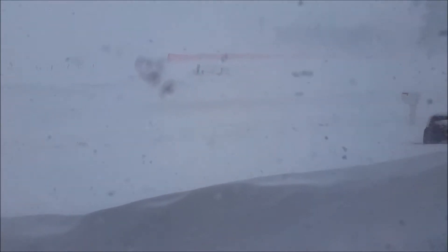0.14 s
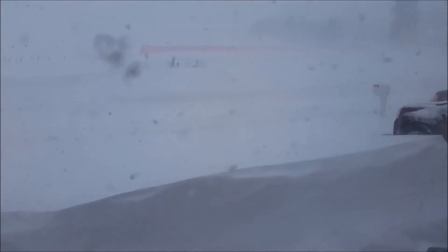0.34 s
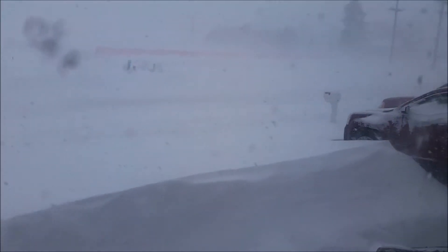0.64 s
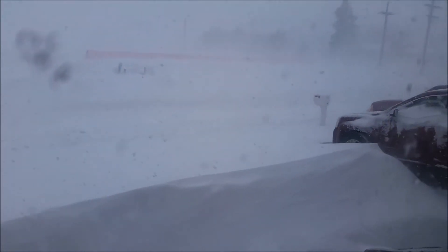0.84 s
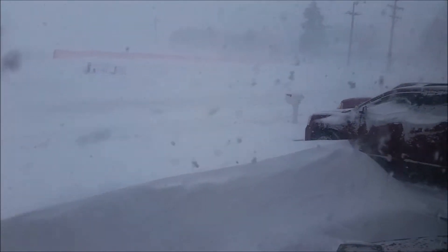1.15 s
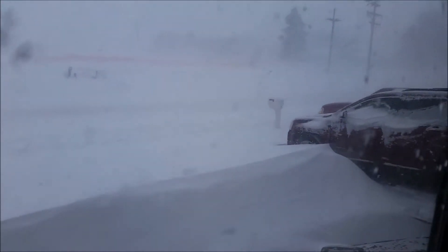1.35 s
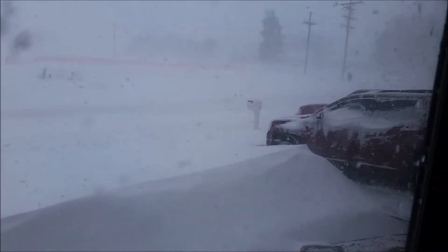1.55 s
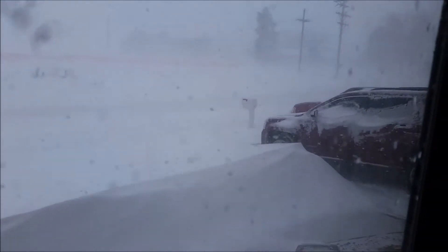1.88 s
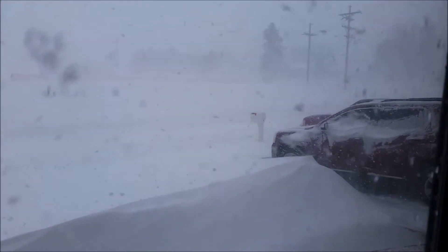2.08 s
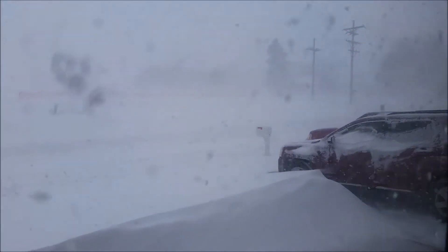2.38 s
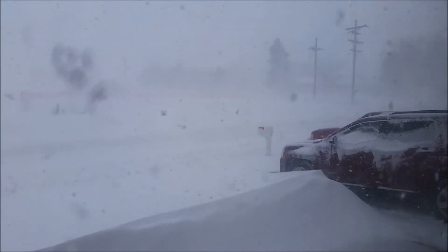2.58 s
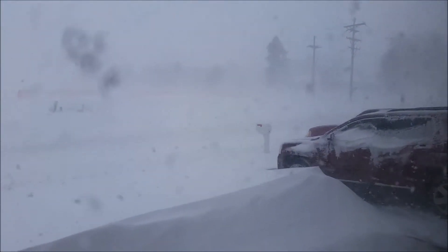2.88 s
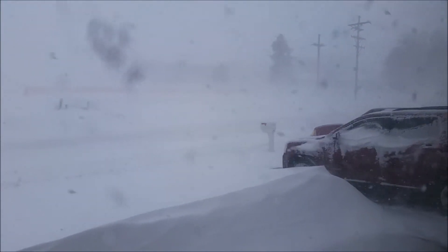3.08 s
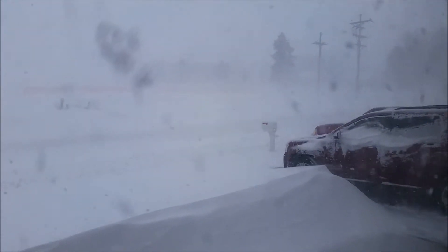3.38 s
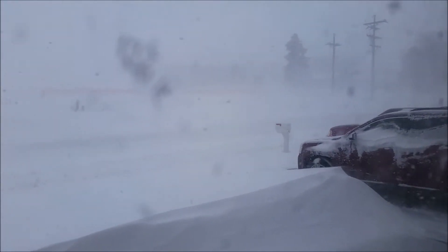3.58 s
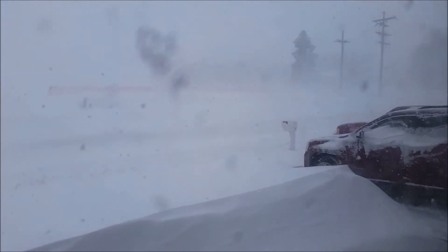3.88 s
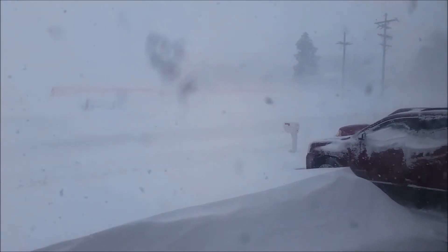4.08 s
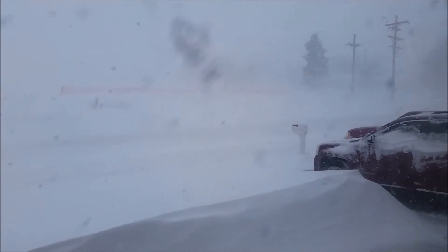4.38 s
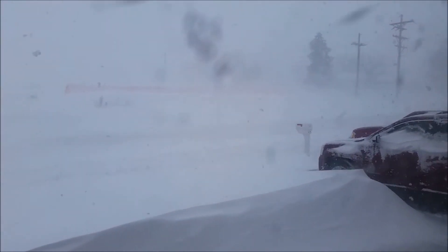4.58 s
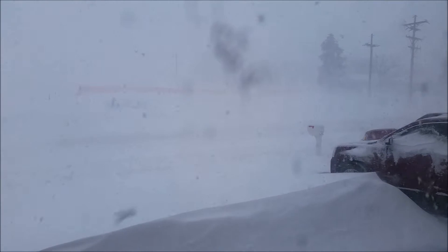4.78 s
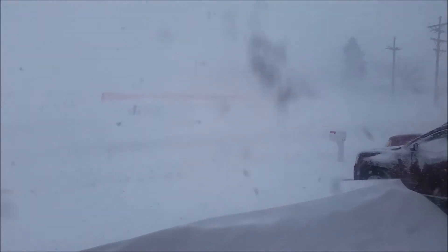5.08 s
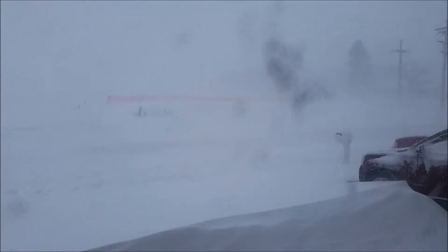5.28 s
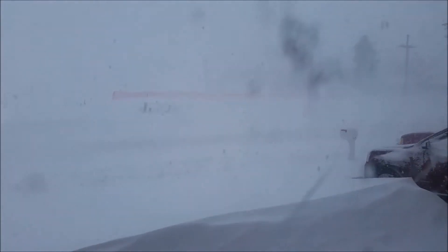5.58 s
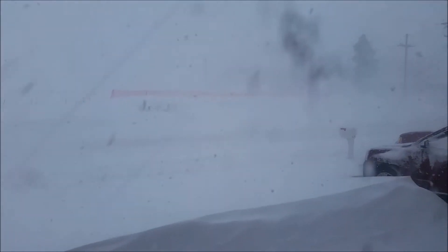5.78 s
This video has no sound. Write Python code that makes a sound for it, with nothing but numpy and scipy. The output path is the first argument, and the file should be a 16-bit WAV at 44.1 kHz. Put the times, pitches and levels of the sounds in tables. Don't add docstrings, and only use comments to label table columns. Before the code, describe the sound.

Muffled gusts and a low pulsing motor hum heard indoors, with busy bumpy handling clatter at first, then sparse snaps and ticks.

```python
import sys
import numpy as np
from scipy import signal
from scipy.fft import rfft, irfft, next_fast_len
from scipy.io import wavfile
from scipy.ndimage import uniform_filter1d, map_coordinates

SR = 44100
rng = np.random.default_rng(int(sys.argv[2]) if len(sys.argv) > 2 else 0)


def file_out(sig):
    cols = np.atleast_2d(sig).T
    lim = np.clip(cols, -1, 1)
    pcm = np.round(lim * 32767).astype(np.int16)
    wavfile.write(sys.argv[1], SR, pcm)


def magnitude_from_level(level_db):
    exponent = np.asarray(level_db, float) / 20
    return 10 ** exponent


N = 261954


def unit(x):
    return x / np.sqrt(np.mean(x ** 2) + 1e-20)


def along(points, hz):
    f, v = np.transpose(points)
    return np.interp(np.log(hz + 1), np.log(f + 1), v)


def curves(rows):
    s, *cols = np.transpose(rows)
    return [np.interp(np.arange(N) / SR, s, c, left=-150, right=-150) for c in cols]


def wobble(rate):
    coarse = np.arange(0, N + 16, 16)
    knots = rng.standard_normal(int(N * rate / SR) + 4)
    return np.interp(np.arange(N), coarse, map_coordinates(knots, [coarse * rate / SR]))


def filtered(x, response):
    m = next_fast_len(x.shape[-1] + 8192)
    return irfft(rfft(x, m) * response(np.fft.rfftfreq(m, 1 / SR)), m)[..., :x.shape[-1]]


def shaped(points):
    return lambda hz: magnitude_from_level(along(points, hz))


def resonances(modes):
    return lambda f: sum(magnitude_from_level(db) * (f * w) ** 2 / ((c * c - f * f) ** 2 + (f * w) ** 2) for c, w, db in modes)


def ring(hz, t60, rise, t):
    return np.sin(2 * np.pi * hz * t) * magnitude_from_level(-60 * t / t60) * (1 - np.exp(-t / rise))


def burst(t60, rise, t):
    return rng.standard_normal((2, len(t))) * magnitude_from_level(-60 * t / t60) * (1 - np.exp(-t / rise))


def panned(left_minus_right_db):
    return left_minus_right_db * np.array([[.5], [-.5]])


def strokes(rows):
    t = np.arange(N) / SR
    return sum(magnitude_from_level(db - 60 * np.where(t < s, (s - t) / swell, (t - s) / t60)) for s, db, swell, t60 in rows)


def add(out, s, sound):
    out[:, round(s * SR):][:, :sound.shape[1]] += sound


# (frequency [Hz], correlation [-1 to 1])
PORT_LIKENESS = [(60, 1), (180, 0.86), (550, 0.49), (1650, -0.2), (4970, 0.028), (15000, -0.21)]
# (frequency [Hz], left minus right [dB])
PORT_LEAN = [(60, -7), (110, 2), (200, -2.5), (380, 1.5), (700, 6.5), (1290, 10), (2380, 9.5), (4400, 8),
             (8120, 3.5), (15000, -3)]


def airflow(gain, patchy_db, alike=PORT_LIKENESS):
    z = signal.stft(rng.standard_normal((2, N)), nperseg=512)[2]
    field = rng.standard_normal(z.shape[1:])
    field = uniform_filter1d(uniform_filter1d(field, size=6, axis=0), size=12, axis=1)
    pair = signal.istft(z * magnitude_from_level(patchy_db * unit(field)), nperseg=512)[1][:, :N]
    m = next_fast_len(N, real=True)
    hz = np.fft.rfftfreq(m, 1 / SR)
    turn = np.arccos(np.clip(along(alike, hz), -1, 1)) / 2
    mid, side = rfft(pair, m) * gain(hz) * [np.cos(turn), np.sin(turn)]
    ports = irfft(magnitude_from_level(panned(along(PORT_LEAN, hz))) * [mid + side, mid - side], m)[:, :N]
    return ports / np.std(ports.mean(axis=0))


# (time [s], strength [dB])
GUST_STRENGTH = [(0, 2), (.3, 1.5), (.55, 7.5), (.85, 1), (1.3, 1.5), (1.6, 4.5), (1.9, 0), (2.5, 1),
                 (3.0, -1), (3.4, 0), (4.5, -1), (5.0, 2), (5.4, -1), (5.94, 0)]
# (frequency [Hz], density [dB per Hz])
WALL_ROAR = [(12, -17.5), (25, -16), (45, -1), (70, -6), (140, 4), (220, -7), (330, -9), (420, -19.5),
             (700, -36.5), (1500, -63)]
# (frequency [Hz], density [dB per Hz])
FRAME_RUSH = [(200, -37.5), (450, 1.5), (950, -4), (1850, -11), (2100, -8.5), (3000, -12), (3750, -30.5),
              (4250, -21), (5600, -27), (7500, -49.5), (10000, -43), (12000, -79.5)]
# (frequency [Hz], density [dB per Hz])
PORT_HISS = [(6000, -36.5), (9000, -26), (11500, -10), (14300, -2), (15700, -0.5)]
# (peak time [s], level [dB], swell over 60 dB [s], decay t60 [s])
SKIN_RUBS = [(.02, -75, .9, 1.5), (.54, -78, .9, .4), (.71, -75, 0.5, 1.8), (1.6, -71.5, 1, .7),
             (5.72, -70, 1, 1.3)]


def wind():
    strength_db, = curves(GUST_STRENGTH)
    gust = wobble(6)
    roar_db = -40.5 + strength_db + 0.51 * gust + 0.97 * wobble(18)
    roar = magnitude_from_level(roar_db) * airflow(shaped(WALL_ROAR), patchy_db=0.43)
    rush_db = -56 + 0.5 * strength_db + 0.95 * gust
    rush = magnitude_from_level(rush_db) * airflow(shaped(FRAME_RUSH), patchy_db=1.16)
    pumping = magnitude_from_level(-55.5 + 6.8 * gust) * airflow(resonances([(45.4, 41, 0)]), patchy_db=0.5, alike=[(30, 0.58)])
    rub_gain = strokes(SKIN_RUBS) * magnitude_from_level(5.5 + 1.5 * wobble(60))
    hiss_gain = magnitude_from_level(-72 + 0.15 * strength_db)
    return roar + rush + pumping + (hiss_gain + rub_gain) * airflow(shaped(PORT_HISS), patchy_db=0)


# (shaft order, mains order, level [dB])
MOTOR_LINES = [(1, 0, -43.3), (2, 0, -52), (3, 0, -43.5), (4, 0, -52.5), (0, 1, -41.3), (1, 1, -47.7),
               (2, 1, -58)]
# (frequency [Hz], level [dB])
LOOSE_PANELS = [(56.2, -57), (177.3, -59), (262.2, -56)]


def heater():
    shaft_hz, mains_hz = 38.257, 119.98
    t = np.arange(N) / SR
    lines = [(shaft * shaft_hz + mains * mains_hz, db) for shaft, mains, db in MOTOR_LINES] + LOOSE_PANELS
    return np.sqrt(2) * sum(magnitude_from_level(db + wobble(3.3)) * np.cos(2 * np.pi * hz * t) for hz, db in lines)


# (frequency [Hz], strength, decay t60 [s])
RIGHT_THUMP = [
    (306, 1.63, .016),
    (86.5, 7.5, .032),
    (96.3, -9, .027),
]
# (frequency [Hz], strength, decay t60 [s], rise [s])
LEFT_THUMP = [(230.6, -0.18, 0.064, .0001), (118, -0.35, 0.075, 0.0027)]
# (frequency [Hz], level [dB], decay t60 [s])
SHELL_MODES = [(855, -6, 0.016), (1000, -3.5, 0.018), (1355, -4.5, 0.017), (1900, -9, 0.011),
               (2550, -18, 0.018), (4500, -37.5, 0.0058)]


def slips(table, stiff, sway, boom_db, fizz_db, sense):
    knock, airy, t = np.zeros((2, N + SR)), np.zeros((2, N + SR)), np.arange(SR // 10) / SR
    for s, thump_db, snap_db, ring_db, ring_hz in table:
        flex = stiff * (1 + 0.038 * rng.standard_normal())
        left = sum(g * ring(hz * flex / stiff, t60, rise, t) for hz, g, t60, rise in LEFT_THUMP)
        body, *pair = [g * ring(hz * flex, t60 / flex, .0002, t) for hz, g, t60 in RIGHT_THUMP]
        shell = ring(ring_hz, .016, .0004, t)
        for hz, db, t60 in SHELL_MODES:
            shell = shell + magnitude_from_level(db + rng.normal(0, 2.5)) * ring(hz * rng.normal(1, .04), t60, .0003, t)
        boom = -magnitude_from_level(thump_db + boom_db) * ring(505 * flex / stiff, 0.027, 0.00019, t)
        crack = burst(0.013, 0.00014, t)
        grit = filtered(crack[0], resonances([(1740, 970, 0.022)]))
        fizz = filtered(crack[1], resonances([(14600, 3550, 0)]))
        snap = ring(2000 * rng.normal(1, .06), .0028, .0001, t) + .5 * ring(850, .005, .0002, t) + .7 * grit
        thump = np.array([sway * left, body + sway * sum(pair)])
        ringing = magnitude_from_level(ring_db - 5.5) * (shell + 1.2 * grit) * [[-1], [.25]]
        edge = np.hypot(magnitude_from_level(snap_db), magnitude_from_level(ring_db)) ** 0.64
        start = s - .0021 / stiff
        add(knock, start, sense * magnitude_from_level(thump_db + 1.0) * thump)
        add(knock, start + 0.00033, sense * magnitude_from_level(snap_db + 3.5) * snap * [[0], [1]])
        add(knock, start + .0007, sense * (ringing + boom * [[1], [.1]]))
        add(airy, start + .0004, edge * magnitude_from_level(fizz_db + np.array([[-12], [5]])) * fizz)
    damped = filtered(knock, lambda hz: 1 / (1 + 1j * hz / 3600) ** 2)
    return (damped + airy)[:, :N]


# (time [s], thump [dB], right snap [dB], left ring [dB], ring frequency [Hz])
SOFT_JERKS = [(0.0822, -23.5, -30, -17, 1400), (0.1298, -22.5, -34, -23.5, 1380),
              (0.3664, -13, -23, -13, 1300), (0.5031, -17, -17, -13.5, 1050),
              (0.5939, -10.5, -27, -20, 1550), (0.6276, -9, -16.5, -11.5, 1120),
              (0.7769, -15.5, -22, -21, 930), (0.9354, -11.5, -12.5, -16, 1490),
              (1.0816, -9.5, -20.5, -20, 1040), (1.307, -12, -40, -11, 960),
              (1.4844, -11.5, -19.5, -33, 1830), (1.5172, -12, -24, -27, 2040),
              (1.6689, -10.5, -24, -26, 880)]


def creaks():
    return slips(SOFT_JERKS, stiff=0.98, sway=0.84, boom_db=-20, fizz_db=-20.5, sense=0.9)


# (time [s], thump [dB], left ring [dB], ring frequency [Hz])
LOOSE_SLIPS = [(0.1517, -21.5, -37, 1820), (0.3802, -21.5, -31, 750), (0.5275, -15.5, -24, 1400),
               (0.6442, -14, -21, 910), (0.6582, -12, -20.5, 1350), (0.6717, -11.5, -23.5, 1400),
               (0.6858, -12.5, -23, 1300), (0.7033, -15, -25, 2140), (0.725, -17, -25.5, 1860),
               (0.9172, -33, -26, 960), (0.9598, -11.5, -21, 990), (0.9782, -14, -34, 1020),
               (0.996, -16, -26.5, 1400), (1.013, -14, -30, 1050), (1.3278, -16, -24, 1450),
               (1.353, -15.5, -26, 1300), (1.3771, -15, -30, 940), (1.3996, -15.5, -27, 1650),
               (1.5392, -15.5, -27, 1250), (1.5569, -13, -24.5, 1130), (1.5739, -17, -24.5, 1180),
               (1.5936, -14, -21.5, 1440), (1.618, -13.5, -23.5, 1010), (1.6364, -14, -25, 1500)]


def chatter():
    table = [(s, thump_db, ring_db - 6.5, ring_db, hz) for s, thump_db, ring_db, hz in LOOSE_SLIPS]
    return slips(table, stiff=0.98, sway=0.88, boom_db=-20.5, fizz_db=-29, sense=0.91)


# (time [s], peak level [dB], body [dB], left minus right [dB])
FLECKS = [(0.2017, -54, -6.5, -7.5), (0.6974, -52.5, 2.5, -5.5), (1.4142, -48.5, -5.5, -5.5),
          (1.5277, -48.5, -9, -6.5), (2.3526, -48.5, -10.5, -11.5), (3.2046, -52.5, -11.5, -8),
          (4.039, -52, -10, -3), (4.883, -51.5, -27, -12), (5.5477, -59, -5, -3), (5.5606, -39, -11, -8),
          (5.568, -30, -12, -9.5), (5.73, -42, -21.5, -6.5)]


def ticks():
    out, t = np.zeros((2, N + SR)), np.arange(SR // 20) / SR
    for s, db, body_db, pan_db in FLECKS:
        fleck = burst(0.022, 0.0007, t)
        high = filtered(fleck, resonances([(14700, 1700, 0.0074)]))
        body = filtered(fleck, resonances([(5500, 7400, 0)]))
        add(out, s, magnitude_from_level(db + 12 + panned(pan_db)) * high + magnitude_from_level(db + body_db + 2) * body * [[1], [.6]])
    return out[:, :N]


LOOSE_LIKENESS = [(100, 0.33), (1000, 0.087)]
# (peak time [s], level [dB], swell over 60 dB [s], decay t60 [s])
SLEEVE_STROKES = [(.204, -62, 0.1, .05), (.36, -64.5, 0.1, .6), (.41, -55.5, 0.14, .09),
                  (.495, -62.5, 0, .2), (.624, -65, 0.3, .6), (1.3, -72.5, 0.1, .9), (1.35, -70.5, .4, .45),
                  (1.75, -64.5, 0.1, .05), (5.561, -58, .006, .08), (5.574, -48, .04, .05),
                  (5.6, -73, 0.2, 1.6), (5.717, -72.5, 0.5, 1.1)]
# (frequency [Hz], density [dB per Hz])
CLOTH_SPECTRUM = [(500, -25.5), (1800, -7), (3200, -5.5), (5000, -7.5), (8500, -12.5), (10900, -20),
                  (14100, -9), (16000, -2)]


def sleeve():
    rustle = strokes(SLEEVE_STROKES) * magnitude_from_level(5 + 2.6 * wobble(120))
    return rustle * airflow(shaped(CLOTH_SPECTRUM), 2.4, LOOSE_LIKENESS)


# (time [s], level [dB], frequency [Hz], width
# [Hz], right port [dB])
FOLDS = [(0.359, -39, 7750, 9000, -21), (0.393, -37, 3000, 4000, -11), (.409, -27, 3170, 4000, -10.5),
         (.486, -43.5, 7500, 6000, -3.5), (.52, -46, 6460, 5880, -8.5), (3.35, -53, 5000, 4000, -6),
         (4.701, -45.5, 900, 1200, 3), (4.707, -33, 2100, 1500, -5.5), (5.56, -36, 4000, 2960, -7.5),
         (5.572, -37.5, 1700, 1800, -7), (5.57, -33.5, 8800, 3000, -9.5), (5.574, -44.5, 14500, 1194, 8),
         (5.585, -48, 14600, 2470, 6), (5.659, -35.5, 1200, 1500, -12)]


def crinkles():
    out, t = np.zeros((2, N + SR)), np.arange(SR // 10) / SR
    for s, db, hz, width_hz, right_db in FOLDS:
        puff = filtered(burst(0.021, 0.00063, t), resonances([(hz, width_hz, 0)]))
        add(out, s, magnitude_from_level(db + 4.5 + np.array([[0], [right_db]])) * puff)
    return out[:, :N]


CATCHES = [.3935, .4048, .4142, .4212, .4283, .4378]


def judders():
    table = [(s, -17 - 0.8 * k, -36, -32, 1300) for k, s in enumerate(CATCHES)]
    return slips(table, stiff=0.98, sway=0.6, boom_db=-14, fizz_db=-36, sense=0.9)


def drag():
    peak_s, swell_s, lets_go_s = 0.3957, .04, .465
    held = uniform_filter1d(1. * (np.arange(N) / SR < lets_go_s), size=400)
    shudder_gain = held * strokes([(peak_s, -21, swell_s, 0.33)]) * magnitude_from_level(-3.0 + 2.45 * wobble(90))
    grit_gain = held * strokes([(peak_s, -39, swell_s, 0.22)]) * magnitude_from_level(-1.0 + 5 * wobble(200))
    body = resonances([(153, 178, 14.0), (246, 153, -19), (480, 500, -20)])
    edge = resonances([(1300, 500, -0.5), (2380, 240, -1.0), (4640, 500, -18.5)])
    return shudder_gain * airflow(body, 0, LOOSE_LIKENESS) + grit_gain * airflow(edge, 0, LOOSE_LIKENESS)


# (time [s], thump [dB], right snap [dB], left ring [dB], ring frequency [Hz])
SPRING_BACKS = [(.9378, -25, -12.5, -27, 1490), (1.2119, -22.5, -11, -29.5, 1450),
                (1.2995, -19.5, -13.5, -19.5, 1000)]


def rebounds():
    return slips(SPRING_BACKS, stiff=1.5, sway=0.92, boom_db=-3.0, fizz_db=-33.5, sense=-0.87)


# (time [s], peak level [dB], left minus right [dB], frequency [Hz])
FINGER_TAPS = [(1.743, -55, 6, 584), (2.317, -40.5, 2, 541), (2.505, -38, -11, 417), (4.343, -40, -5, 404),
               (4.777, -41, 9.5, 587), (5.632, -40, -10, 519), (5.66, -39, 2, 668)]


def taps():
    out, t = np.zeros((2, N + SR)), np.arange(SR // 20) / SR
    for s, db, pan_db, hz in FINGER_TAPS:
        tap = ring(hz, 0.0065, 0.00028, t) + 0.3 * ring(2.0 * hz, .006, .0001, t)
        add(out, s, magnitude_from_level(db + 8.5 + panned(pan_db)) * tap)
    return out[:, :N]


# (time [s], thump [dB], right snap [dB], left ring [dB], ring frequency [Hz])
HARD_JERKS = [(2.3845, -26, -48, -46.5, 1820), (2.4534, -19, -23.5, -25, 1040),
              (2.6488, -21, -25, -51, 1670), (2.7236, -20.5, -21, -24.5, 900), (2.782, -25, -29, -27, 2500),
              (3.2372, -17.5, -20, -23, 1510), (3.5617, -17.5, -13.5, -26, 1410),
              (3.9602, -24.5, -23.5, -26, 1160), (4.7065, -30.5, -35, -27, 1400)]


def snaps():
    return slips(HARD_JERKS, stiff=1.36, sway=0.93, boom_db=-4, fizz_db=-34.5, sense=0.94)


def scene():
    jerks = creaks() + chatter() + judders() + rebounds() + snaps()
    return wind() + heater() + jerks + ticks() + sleeve() + crinkles() + drag() + taps()


def band_limit(x):
    return signal.sosfilt(signal.butter(12, 16530, fs=SR, output="sos"), x)


def record(dry):
    mix = filtered(dry, lambda hz: magnitude_from_level(-36 * (hz > 15850)) * (hz < 16480))
    return band_limit(mix)


dry = scene()
out = record(dry)
file_out(out)
```